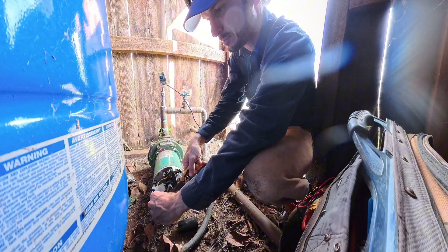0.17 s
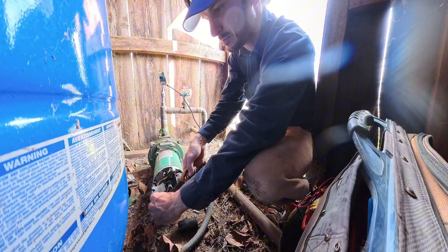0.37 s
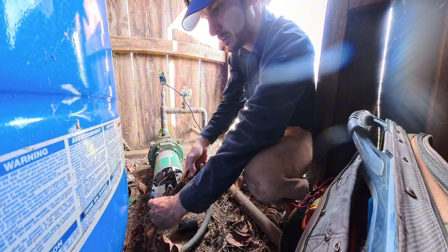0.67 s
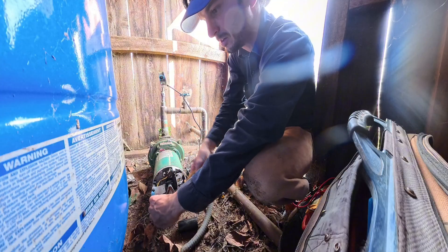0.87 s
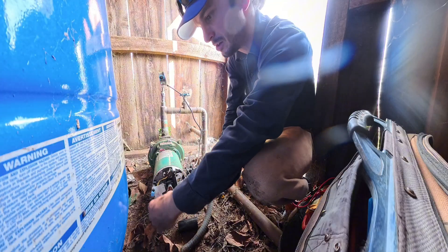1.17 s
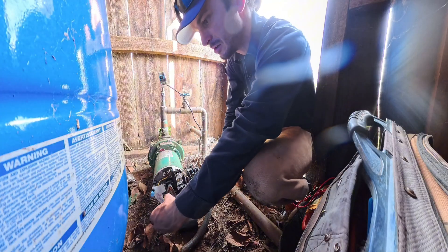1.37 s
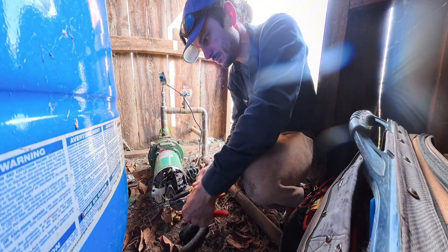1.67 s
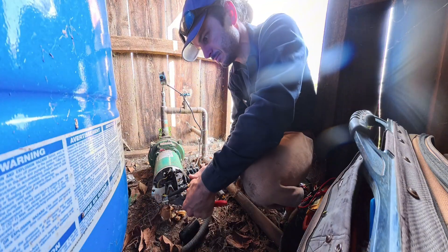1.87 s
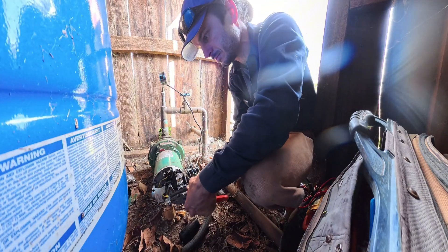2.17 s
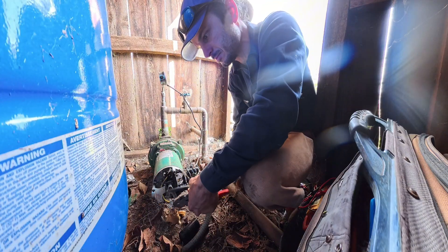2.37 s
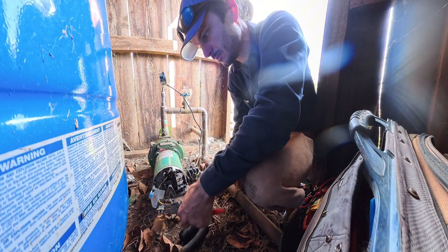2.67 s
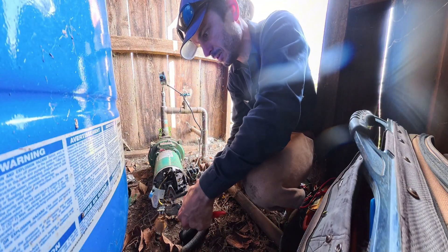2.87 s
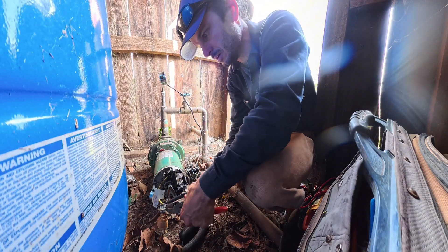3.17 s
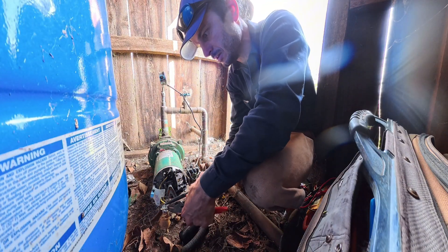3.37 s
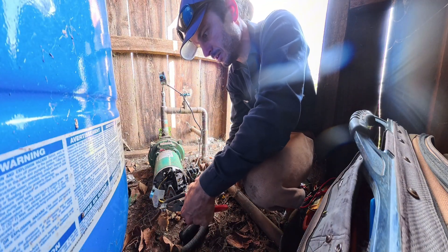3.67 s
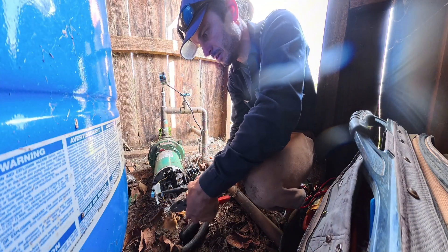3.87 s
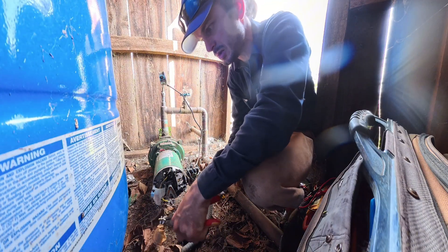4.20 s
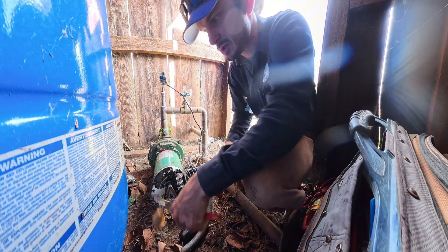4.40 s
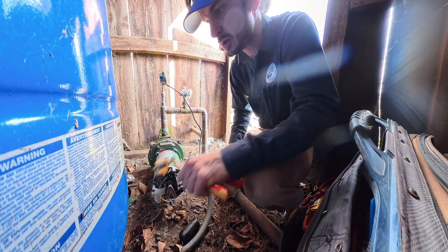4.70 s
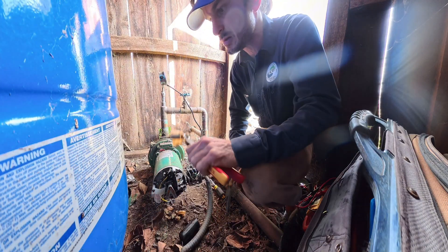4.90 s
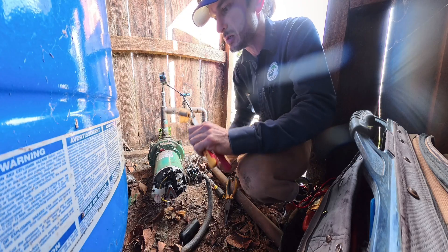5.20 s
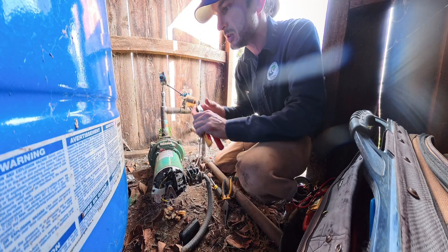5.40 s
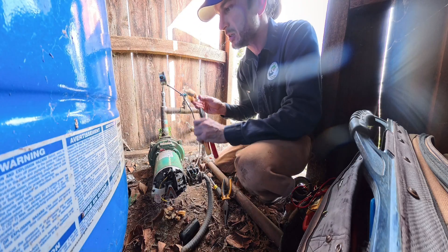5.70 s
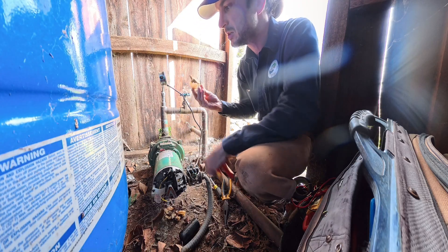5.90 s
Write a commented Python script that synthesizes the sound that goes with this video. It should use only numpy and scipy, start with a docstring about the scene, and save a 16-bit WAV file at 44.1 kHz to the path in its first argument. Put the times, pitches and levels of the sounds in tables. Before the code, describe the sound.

Small close metallic ticks and jaw snips with a faint bird outside, a leafy crackle, and finally one loud ringing clatter with a hollow boom.

```python
"""Pliers and wire ends click, snip and scrape at the open motor of a pump in a small wooden enclosure.
Short noise bursts make the touches; filtered grains and noise make the wire, dry leaves and a sleeve.
Then a steel tool drops: decaying sines ring over the boom of a hollow tank, among dull noise-burst knocks.
Support thuds, a small bird's gliding whistles, outdoor air and low rumble fill in, close and almost mono."""
import sys
import numpy as np
from scipy import signal
from scipy.fft import rfft, irfft
from scipy.io import wavfile
from scipy.ndimage import uniform_filter1d

SR = 44100
rng = np.random.default_rng(int(sys.argv[2]) if len(sys.argv) > 2 else 0)


def digitize_waveform(pressure):
    """Quantize a signal to 16-bit integers and store it at the path in sys.argv[1].

    Rows of a 2-D input are taken as channels; values are limited to [-1, 1].
    """
    field = np.atleast_2d(pressure).T
    bounded = np.clip(field, -1, 1)
    quanta = np.round(bounded * 32767).astype(np.int16)
    wavfile.write(sys.argv[1], SR, quanta)


N = 266760
TIME = np.arange(N) / SR  # s

# Pliers and wire ends touching the motor; the row at 5.1335 s is instead the bright edge of the falling tool's
# first knock. Each row: start in seconds, relative level in dB, brightness in dB per kHz, slip length in ms,
# contact resonance in Hz, its lift in dB.
TOUCHES = [(0.0593, -40.5, 0.7, 1.7, 3030, 8), (.437, -41.5, -.5, 1.2, 3840, 5.5),
           (0.5139, -43.5, 0, 3.8, 4000, 10), (.53, -42, -0.5, 6, 3900, -1),
           (0.825, -41.5, -0.5, 12, 3400, 6), (.935, -34.5, -2.5, 3.2, 1840, 10.5),
           (1.111, -36, -.5, 7.3, 615, 25), (1.1304, -38.5, -2, 1.4, 3410, 5),
           (1.238, -39, 0.5, 10.2, 1070, 14), (1.4358, -48, 0, 2.7, 4180, 9.5),
           (1.477, -47.5, -.5, 7.1, 1550, 19.5), (1.935, -45, -3.5, 17, 700, 4),
           (2.003, -45.5, -1, 7.6, 1900, 11), (2.308, -43.5, 0, 16.3, 5120, -1),
           (2.5109, -30.5, -1.9, 1.1, 5100, 10), (2.581, -39, -0.85, 2.2, 2500, 10.5),
           (2.625, -37, 0, 6.9, 9400, 6.5), (2.988, -45.5, -9.5, 9, 1660, 10),
           (3.023, -54.5, -5.5, 30, 1680, 13), (3.2197, -53, -4.5, 3.16, 1607, 23),
           (3.49, -40, 0.05, 10, 6600, -4), (3.6703, -43.5, -1.6, 2.6, 3300, 21),
           (3.882, -36.5, -.2, 13.7, 3844, 5), (3.913, -40.5, -7, 2.2, 1445, 27),
           (4.4492, -44.5, 1, 2, 2776, 15.5), (4.5399, -45, 0.2, 3.4, 5400, 7),
           (5.1335, -44.5, -1.7, 2.5, 1100, 7), (5.9601, -38.5, -3.5, 5.5, 850, 8.5)]
# Dry stalks cracking in the hand. Each row: start in seconds, relative level in dB, resonance in Hz.
STALK_CRACKS = [(4.1506, -32.5, 7600), (4.1969, -30, 2720), (4.213, -34, 8700)]
CRACK_BRIGHT_DB, CRACK_SLIP_MS, CRACK_LIFT_DB = 0.2, 3.9, 10  # dB per kHz, ms, dB
# Jaws snapping shut and rebounding. Each row: start in seconds, relative level in dB, brightness in dB
# per kHz, slip length in ms, contact resonance in Hz, first rebound gap in seconds, rebound step in dB.
JAW_SNIPS = [(0.9255, -28, 0.33, 4.7, 3810, .008, -14.5), (2.6522, -27, 0.9, 2.7, 4200, 0.0039, -28),
             (3.1119, -25, 0.78, 0.48, 5260, 0.02, -12), (3.275, -27.5, 0.85, 1.5, 4560, 0.018, -5),
             (3.385, -26.5, 0.4, 2.6, 4500, 0.01, -8)]
SNIP_LIFT_DB, REBOUND_LIFT_DB = 12, 11.5
REBOUND_HZ, REBOUND_SLIP_MS, REBOUND_BRIGHT_DB = 3580, 1.9, -0.7  # Hz, ms, dB per kHz
REBOUND_SHRINK = 0.45  # each gap is this share of the one before
# Base colour of every click. Each row: frequency in Hz, gain in dB.
CLICK_SPECTRUM = [(150, -38), (500, -7), (1100, -5.5), (1400, -3), (2400, -1.5), (3500, 1.5), (4700, -2.5),
                  (6000, 2), (7300, -2), (11500, -7.5), (15500, -20)]
# Resonances of the motor's open end. Each row: frequency in Hz, width in Hz, greatest lift in dB.
HOUSING_MODES = [(688, 100, 9), (1101, 120, 10.5), (3600, 160, 4), (5080, 100, 1.5), (6070, 120, 2)]
TOUCH_SPREAD = 0.32  # largest share of a housing lift that a touch may lose
CONTACT_WIDTH = 0.27  # of a contact's resonance, as a share of its frequency

# Wire drawn across the housing. Each row: start in seconds, length in seconds, level in dB.
WIRE_STROKES = [(-.03, 0.62, -45), (1.93, .44, -57.5)]
SCRAPE_ATTACK_S, SCRAPE_SAG_DB_PER_S, SCRAPE_RELEASE_S = 0.015, -19, 0.3
# Colour of the scraping wire. Each row: frequency in Hz, gain in dB.
WIRE_SPECTRUM = [(700, -22.5), (1200, -22), (1700, -9), (2150, 3), (2400, 1.5), (2600, -7), (3340, -4),
                 (4310, -11), (5600, -3.5), (6400, -2.5), (7200, -12), (8200, -19), (9600, -12.5),
                 (15000, -28)]
# A hand grabbing in the dry leaves. Each row: start in seconds, length in seconds, level in dB.
LEAF_GRABS = [(1.92, 0.04, -60), (4.09, 0.14, -38.5), (4.25, 0.086, -39)]
GRAB_ATTACK_S, GRAB_RELEASE_S = 0.023, 0.068
# Colour of the leaves. Each row: frequency in Hz, gain in dB.
LEAF_SPECTRUM = [(120, -49.5), (200, -31), (333, -4), (677, -1), (1300, -9.5), (1680, 0.5), (2510, -4.5),
                 (2800, -2), (3240, -3.5), (8500, -4.5), (15500, -17.5)]
SQUEAK_S, SQUEAK_LENGTH_S, SQUEAK_DB = 4.089, 0.042, -45
# The sleeve sliding as the arm moves. Each row: start in seconds, length in seconds, level in dB.
SLEEVE_SLIDES = [(4.42, 0.49, -53), (5.12, .39, -51)]
SLIDE_ATTACK_S, SLIDE_SAG_DB_PER_S, SLIDE_RELEASE_S = 0.18, -8, 0.24
# Colour of the cloth. Each row: frequency in Hz, gain in dB.
SLEEVE_SPECTRUM = [(470, -63), (800, -4), (1270, -9), (1580, 0.5), (2630, -0.5), (4160, 4), (9440, -3.5),
                   (14400, -10.5), (15500, -35)]

# The tool landing and bouncing. Each row: start in seconds, steel ring in dB, tank boom in dB.
TOOL_LANDINGS = [(5.1905, -15, -14), (5.2466, -64, -35)]
# Ring of the steel tool. Each row: frequency in Hz, mean level in dB, early 60 dB decay in seconds.
STEEL_PARTIALS = [(1299, 0, .52), (1333, -16, .3), (1407, -.5, .98), (1550, -17, .85), (1769, -13, .95),
                  (1040, -16, .25), (1131, -14, .25), (2380, -26, .3), (2700, -30, .4), (3250, -29, .35),
                  (3835, -24, .55), (3876, -26, .65), (4210, -28, .7), (4570, -28, .65), (6430, -34, .8),
                  (6830, -33, .6), (7250, -37, .7)]
# Boom of the hollow tank. Each row: frequency in Hz, mean level in dB, early 60 dB decay in seconds.
TANK_PARTIALS = [(60, 2, 1.1), (145, -2, 1.05), (236, -2, .45), (420, -4, .42), (469, -7, .38),
                 (560, -6, .38), (727, -8, .33), (79, -5, .8), (102, -7, 1.1), (118, -10, .9),
                 (160, -10, .8), (210, -4, .25), (273, -6, .4), (324, -13, .45), (690, -10, .3)]
# Colour of the steel's chatter. Each row: frequency in Hz, gain in dB.
CHATTER_SPECTRUM = [(800, -18), (1900, 11), (3200, -22), (3900, 9), (4600, -9), (5400, 7), (6700, 4),
                    (10000, -12), (15000, -17)]
# Knocks and scuffs on pump and surroundings. Each row: start in seconds, level in dB, 60 dB decay in seconds.
DULL_KNOCKS = [(2.515, -38.5, 0.57), (2.99, -41.5, 0.12), (3.021, -44, 0.18), (5.133, -27, 0.24),
               (5.189, -13.5, 0.11), (5.209, -33.5, 0.89), (5.2456, -17.5, 0.2), (5.988, -43, 0.37)]
# Colour of the knocks. Each row: frequency in Hz, gain in dB.
KNOCK_SPECTRUM = [(50, -4.5), (130, 14), (250, -1.5), (450, 4), (720, 0.5), (850, -5), (1100, 3),
                  (1700, -13), (2400, -13), (5000, -34), (12000, -36.5)]

# Nudges to the microphone's support. Each row: start in seconds, length in seconds, level in dB,
# mean sway frequency in Hz, thud against the sway in dB.
SUPPORT_NUDGES = [(-.03, 0.29, -42, 50, -24), (0.308, .34, -42.5, 37.9, -15),
                  (0.822, 0.1, -38.5, 43.25, -8.5), (1.454, .15, -41.5, 42.4, -9.5),
                  (2.525, 0.12, -40.5, 78, -3), (3.31, 0.17, -41.5, 33.5, -8), (3.433, 0.08, -44, 67.9, -2),
                  (3.496, 0.072, -35, 31.64, -10.5)]
NUDGE_ATTACK_S, NUDGE_RELEASE_S = 0.03, 0.33
# The bird's two rising notes. Each row: start within the phrase in seconds, nominal start in Hz,
# nominal end in Hz, length in seconds, relative level in dB.
PHRASE_NOTES = [(0, 2637, 3760, .033, -40.5), (0.108, 3073, 3850, .055, -43)]
BIRD_START_S, PHRASE_S, BIRD_STOP_S = 0.045, 0.289, 1.626
BIRD_BEND = 1.4  # above 1, the pitch rises fastest at the end
# Swell of the outdoor murmur. Each row: time in seconds, relative level in dB.
MURMUR_LEVELS = [(0.0, -51.5), (0.82, -62.5), (1.06, -51.5), (1.35, -55.5), (1.6, -60), (1.66, -74),
                 (1.91, -64), (2.14, -60.5), (3.0, -70), (3.21, -60.5), (3.78, -66.5), (4.01, -60.5),
                 (4.26, -48), (4.75, -56.5), (5.1, -53), (5.7, -55.5), (6.049, -60.5)]
MURMUR_DB = 2  # trim on the whole murmur
# Colour of the outdoor air. Each row: frequency in Hz, gain in dB.
OUTDOOR_SPECTRUM = [(100, -19), (220, -2.5), (330, 0), (480, 5), (800, -0.5), (1100, 0), (1500, -1.5),
                    (2200, -9.5), (3400, -12.5), (5000, -21.5), (11000, -24.5), (15500, -43)]
# Colour of the low rumble and the support's thuds. Each row: frequency in Hz, gain in dB.
RUMBLE_SPECTRUM = [(15, 6), (35, 0), (60, -10), (110, -7), (170, -21), (400, -39), (2000, -85.5)]
TOP_HZ = 15500  # edge of the recorder's passband


def clicks():
    """Single touches of pliers and wire, the bright edge of the falling tool's first knock, and stalks cracking
    beside the motor, each a burst of slips."""
    out = np.zeros(N)
    for s, db, bright_db, slip_ms, contact_hz, lift_db in TOUCHES:
        add(out, s, click(db, bright_db, slip_ms, contact_hz, lift_db))
    for s, db, hz in STALK_CRACKS:
        add(out, s, click(db, CRACK_BRIGHT_DB, CRACK_SLIP_MS, hz, CRACK_LIFT_DB))
    return out


def snips(count=2):
    """A bright snap, then duller rebounds that come ever sooner and weaker."""
    out = np.zeros(N)
    for s, db, bright_db, slip_ms, contact_hz, gap, rebound_db in JAW_SNIPS:
        add(out, s, click(db, bright_db, slip_ms, contact_hz, SNIP_LIFT_DB))
        for k in range(count):
            s += gap * REBOUND_SHRINK ** k
            db += rebound_db
            add(out, s, click(db, REBOUND_BRIGHT_DB, REBOUND_SLIP_MS, REBOUND_HZ, REBOUND_LIFT_DB))
    return out


def click(db, bright_db, slip_ms, contact_hz, lift_db, gain_db=27):
    """A burst of slips, coloured by the contact and by the motor housing."""
    housing = spectrum_db(CLICK_SPECTRUM, bins())
    for hz, width, lift in HOUSING_MODES:
        # each touch lands elsewhere and wakes the resonances more or less
        housing = housing + lift * (1 - TOUCH_SPREAD * rng.random()) * bump(hz, width)
    tilt = bright_db * np.minimum(bins() / 1000, 12)  # levels off at 12 kHz
    contact = lift_db * bump(contact_hz, CONTACT_WIDTH * contact_hz)
    x = signal.fftconvolve(slips(slip_ms), response(housing + tilt + contact))
    return undb(db + gain_db) * x / np.linalg.norm(x)


def slips(length_ms, size=4096):
    """A burst of uneven micro-impacts that builds and fades, evened out to a broadly white spectrum."""
    u = 2000 * TIME[:size] / length_ms  # the swell peaks at half the slip length
    impacts = rng.standard_normal(size) * rng.exponential(size=size)
    burst = impacts * u * np.exp(-u)
    power = uniform_filter1d(abs(rfft(burst)) ** 2, size=40)
    return signal.fftconvolve(burst, response(-10 * np.log10(power)))


def bump(hz, width):
    """Shape of a resonance over the bins, 1 at its centre."""
    return 1 / (1 + (2 * (bins() - hz) / width) ** 2)


def wire():
    """Wire rasps finely: dense coloured grains flicker in level under each stroke."""
    rasp = colour(grains(rate=7500, spread_db=2.5), WIRE_SPECTRUM) * undb(1.5 * walk(30))
    return rasp * strokes(WIRE_STROKES, SCRAPE_ATTACK_S, SCRAPE_RELEASE_S, SCRAPE_SAG_DB_PER_S)


def leaves():
    """Leaves crackle coarsely: sparser, more uneven grains."""
    crackle = grains(rate=1800, spread_db=3.8) * undb(2.2 * walk(90))
    return colour(crackle, LEAF_SPECTRUM) * strokes(LEAF_GRABS, GRAB_ATTACK_S, GRAB_RELEASE_S)


def squeak():
    """A stalk squeaks among the leaves: one sine with unsteady pitch and level."""
    hz = 2820 + 70 * walk(360)
    stalk = np.sin(2 * np.pi * np.cumsum(hz) / SR) * undb(3.4 * walk(150))
    return stalk * strokes([(SQUEAK_S, SQUEAK_LENGTH_S, SQUEAK_DB)], attack_s=0.0046, release_s=0.08)


def sleeve():
    """Sliding cloth is nearly smooth: coloured noise under slow strokes."""
    cloth = colour(rng.standard_normal(N), SLEEVE_SPECTRUM)
    return cloth * strokes(SLEEVE_SLIDES, SLIDE_ATTACK_S, SLIDE_RELEASE_S, SLIDE_SAG_DB_PER_S)


def dropped_tool(chatter_db=-30, waver_db=1.3):
    """Steel rings at once and chatters on what it hit; the heavy tank takes a moment to boom."""
    out = np.zeros(N)
    steel = ring(STEEL_PARTIALS, rise_s=0.0069, waver_db=waver_db, late_fall_s=0.5)
    rattle = colour(rng.standard_normal(N), CHATTER_SPECTRUM)[:SR]
    steel = steel + undb(chatter_db) * abs(steel) * rattle  # chatter follows the ring's swing
    tank = ring(TANK_PARTIALS, rise_s=0.041, waver_db=waver_db, late_fall_s=0.79)
    for s, steel_db, tank_db in TOOL_LANDINGS:
        add(out, s, undb(steel_db) * steel)
        add(out, s, undb(tank_db) * tank)
    return out


def ring(modes, rise_s, waver_db, late_fall_s):
    """Decaying modes whose levels waver at random and fall faster around and after late_fall_s."""
    t = TIME[:SR]
    partials = np.zeros(SR)
    for hz, db, t60 in modes:
        level = undb(db + waver_db * walk(25.8)[:SR]) * fade(t, t60)
        partials += level * np.sin(2 * np.pi * (hz * t + rng.random()))
    return partials * (1 - np.exp(-t / rise_s)) / (1 + (t / late_fall_s) ** 8)


def knocks():
    """Dull blows on a dense, damped body: decaying noise bursts take on its colour."""
    out, t = np.zeros(N), TIME[:SR // 2]
    body = response(spectrum_db(KNOCK_SPECTRUM, bins()))
    for s, db, t60 in DULL_KNOCKS:
        blow = rng.standard_normal(len(t)) * fade(t, t60)
        add(out, s, undb(db) * signal.fftconvolve(blow, body))
    return out


def support(waver=0.1):
    """Each nudge makes the microphone's support sway at a low, unsteady pitch and thud softly."""
    out = np.zeros(N)
    pace = np.cumsum(1 + waver * walk(40)) / SR  # time that runs unevenly
    thuds = colour(grains(rate=380, spread_db=1.0), RUMBLE_SPECTRUM)
    for s, length, db, hz, thud_db in SUPPORT_NUDGES:
        sway = unit(np.sin(2 * np.pi * hz * pace))
        movement = strokes([(s, length, db)], NUDGE_ATTACK_S, NUDGE_RELEASE_S)
        out += (sway + undb(thud_db) * thuds) * movement
    return out


def bird(count=6, scatter_t60=0.23, direct_db=-13, scatter_db=-8):
    """Evenly repeated pairs of rising whistles, blurred by fences and trees, cut off at BIRD_STOP_S."""
    out, t = np.zeros(N), TIME[:SR // 4]
    for k in range(count):
        for offset, start_hz, end_hz, length, db in PHRASE_NOTES:
            u = np.linspace(0, 1, int(length * SR))
            hz = start_hz + (end_hz - start_hz) * u ** BIRD_BEND
            hz = hz * (1 + 0.014 * rng.standard_normal())  # each note is pitched a little differently
            swell = np.sin(np.pi * u ** 0.63)  # peaks early, then weakens
            note = undb(db) * swell * np.sin(2 * np.pi * np.cumsum(hz) / SR)
            add(out, BIRD_START_S + k * PHRASE_S + offset, note)
    scatter = rng.standard_normal(len(t)) * fade(t, scatter_t60)
    blurred = signal.fftconvolve(out, scatter / np.linalg.norm(scatter))[:N]
    return (undb(direct_db) * out + undb(scatter_db) * blurred) * (TIME < BIRD_STOP_S)


def enclosure(x, t60_low=0.13, t60_high=0.097, split_hz=3500, wet_db=-0.5, side_db=-10, side_hz=5500):
    """Close boards return dense short echoes; only their treble differs between left and right."""
    n = SR // 3
    t = TIME[:n]
    low_pass = signal.butter(2, split_hz, fs=SR, output="sos")
    high_pass = signal.butter(2, split_hz, "high", fs=SR, output="sos")
    low = signal.sosfilt(low_pass, rng.standard_normal((2, n)))
    high = signal.sosfilt(high_pass, rng.standard_normal((2, n)))
    echoes = (low * fade(t, t60_low) + high * fade(t, t60_high)) * (1 - np.exp(-t / 0.00023))
    mid, side = (signal.fftconvolve(x, h / np.linalg.norm(h))[:N] for h in echoes)
    side = signal.sosfilt(signal.butter(3, side_hz, "high", fs=SR, output="sos"), side)
    return x + undb(wet_db) * mid + undb(side_db) * side * np.array([[1], [-1]])


def outdoor_air():
    """A murmur of outdoor air: coloured noise that swells and sinks."""
    s, db = np.transpose(MURMUR_LEVELS)
    level_db = MURMUR_DB + np.interp(TIME, s, db) + 0.49 * walk(13)
    return colour(rng.standard_normal(N), OUTDOOR_SPECTRUM) * undb(level_db)


def rumble():
    """Low noise with a slowly wandering level."""
    return colour(rng.standard_normal(N), RUMBLE_SPECTRUM) * undb(-50.5 + 2.8 * walk(7.9))


def strokes(rows, attack_s, release_s, sag_db=0):
    """Gain of movements: each builds up, sags by dB per second over its length, then fades out."""
    gain = np.zeros(N)
    for s, length, db in rows:
        t = np.maximum(TIME - s, 0)
        held = undb(db + sag_db * np.minimum(t, length))
        attack = np.minimum(t / attack_s, 1)
        gain += held * attack * fade(np.maximum(t - length, 0), release_s)
    return gain


def grains(rate, spread_db):
    """Many tiny ticks at a mean rate per second, a few of them much larger than the rest."""
    size = undb(spread_db * np.minimum(rng.exponential(size=N), 5))
    return (rng.random(N) < rate / SR) * rng.standard_normal(N) * size


def walk(rate):
    """Slow chance at rms 1: random steps at a rate in Hz, smoothed twice."""
    k = int(SR / rate)
    steps = np.repeat(rng.standard_normal(N // k + 1), k)
    return unit(uniform_filter1d(uniform_filter1d(steps, k), k)[:N])


def fade(t, t60):
    """Exponential decay, 60 dB down after t60."""
    return np.exp(-np.log(1000) * t / t60)


def colour(x, points):
    """Give a steady sound a spectrum, at rms 1."""
    gain = undb(spectrum_db(points, np.fft.rfftfreq(N, 1 / SR)))
    return unit(irfft(rfft(x) * gain, N))


def spectrum_db(points, hz):
    """Read (Hz, dB) points on a log-frequency axis."""
    f, db = np.transpose(points)
    return np.interp(np.log(hz + 1), np.log(f), db)


def response(db, size=4096):
    """Causal impulse response of unit energy, its spectrum shaped by the dB per bin."""
    cepstrum = irfft(np.log(undb(db)))
    cepstrum[1:size // 2] *= 2  # folding the cepstrum gives minimum phase
    cepstrum[size // 2 + 1:] = 0
    h = irfft(np.exp(rfft(cepstrum)))
    return h / np.linalg.norm(h)


def bins(size=4096):
    """Frequencies of the bins of a response."""
    return np.fft.rfftfreq(size, 1 / SR)


def add(out, s, x):
    """Mix x into out at time s."""
    i = int(s * SR)
    out[i:i + len(x)] += x[:N - i]


def unit(x):
    """Scale to rms 1."""
    return x / np.sqrt(np.mean(x ** 2))


def undb(db):
    """Decibels to gain."""
    return 10 ** (np.asarray(db) / 20)


def scene():
    """Small sounds echo between the boards; the heavy ones carry their own ring."""
    handwork = clicks() + snips() + wire() + leaves() + squeak() + sleeve()
    heavy = dropped_tool() + knocks() + support()
    surroundings = bird() + outdoor_air() + rumble()
    return enclosure(handwork) + heavy + surroundings


def record(dry):
    """The recorder cuts the top with a steep low-pass."""
    return signal.sosfilt(signal.ellip(8, 0.2, 70, TOP_HZ, fs=SR, output="sos"), dry)


dry = scene()
out = record(dry)
digitize_waveform(out)
```